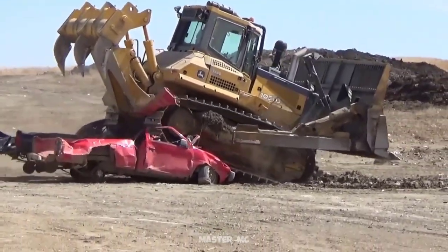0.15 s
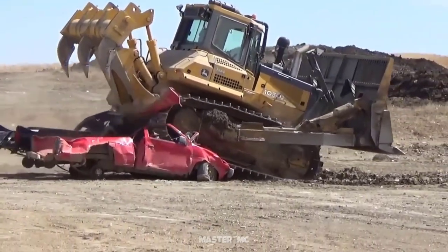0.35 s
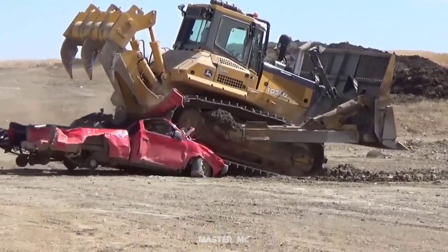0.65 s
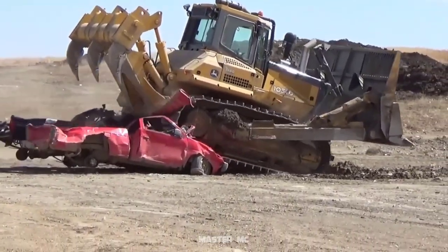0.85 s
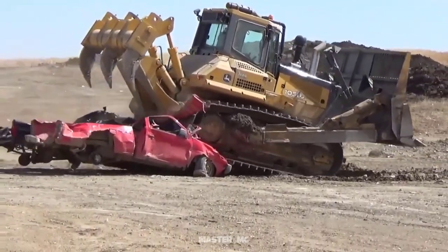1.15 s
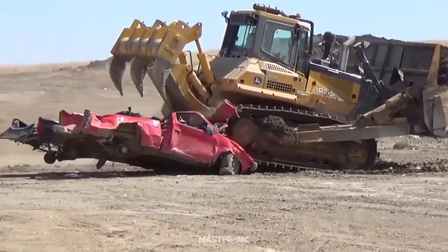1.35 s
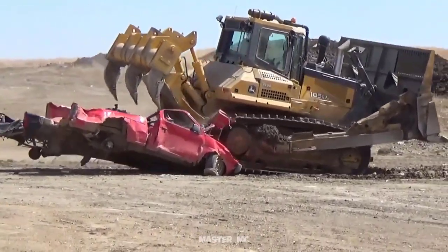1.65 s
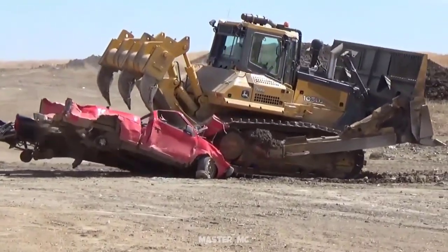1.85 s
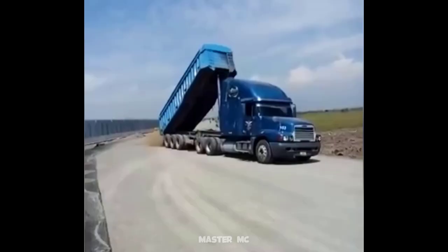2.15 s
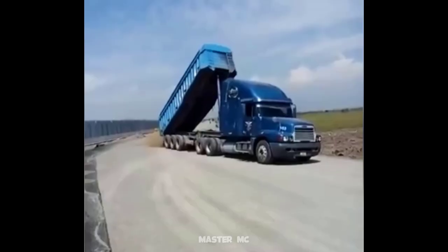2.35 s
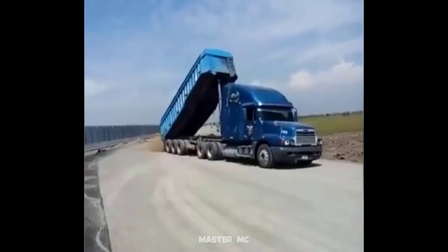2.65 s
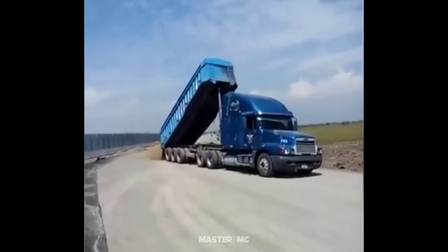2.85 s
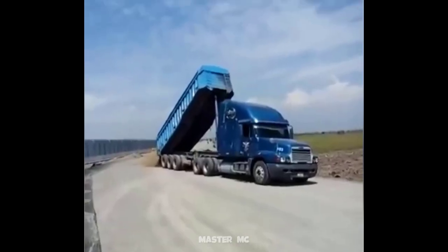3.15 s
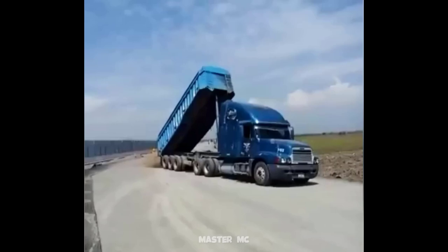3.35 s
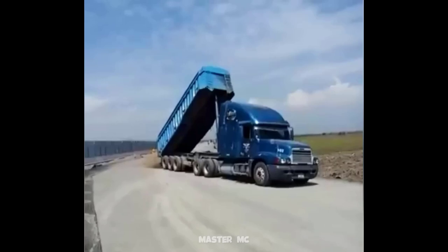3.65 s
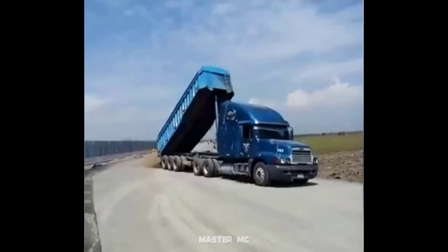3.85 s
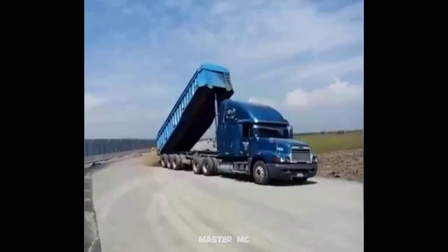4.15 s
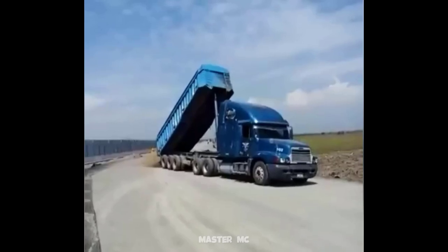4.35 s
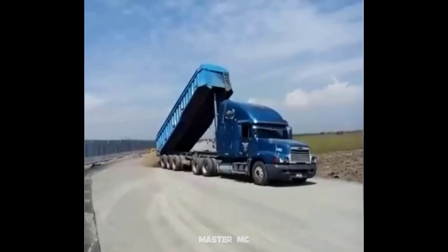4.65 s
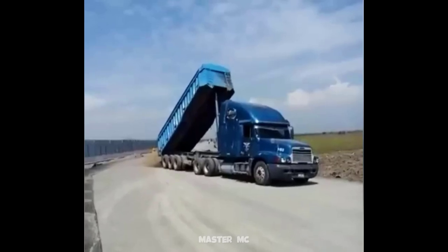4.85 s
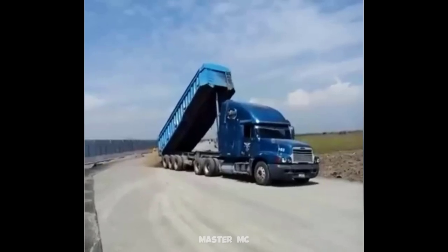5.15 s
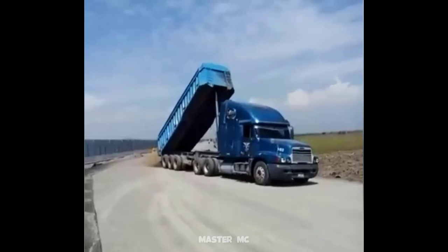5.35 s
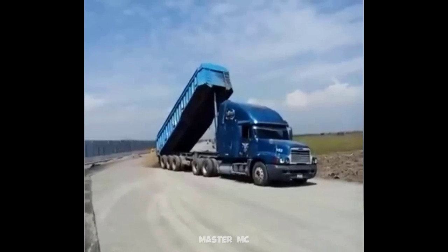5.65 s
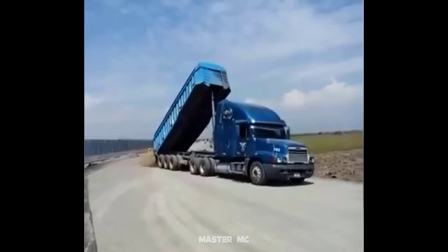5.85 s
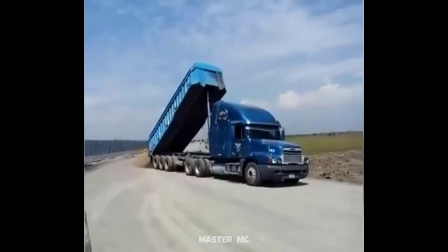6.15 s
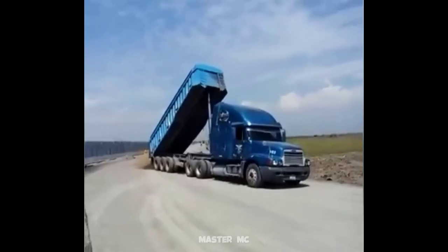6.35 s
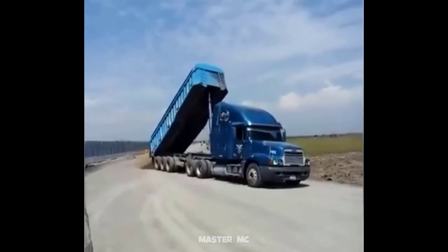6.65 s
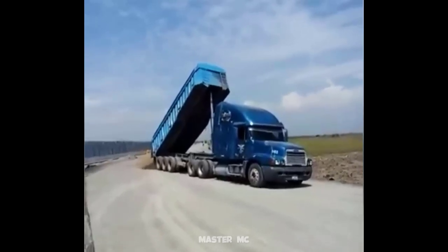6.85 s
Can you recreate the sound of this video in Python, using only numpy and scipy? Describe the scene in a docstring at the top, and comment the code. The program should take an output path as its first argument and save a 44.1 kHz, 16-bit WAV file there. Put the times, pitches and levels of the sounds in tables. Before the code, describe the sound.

A crawler bulldozer drives over a car outdoors, loud and fairly close. Its diesel roars while the tracks scrape over gravel and sheet metal crunches, squeals and tinkles in bursts. After about two seconds, at the hardest crunch, the sound cuts off. A distant tipper truck follows, quieter, duller and in mono, its engine humming at a steady fast idle with a faint hydraulic whine.

```python
"""First a crawler bulldozer grinds over a car: its diesel roars, its tracks scrape over gravel and sheet
metal crunches in bursts, hardest near 2 s, with a drone, brief moans, squeals and screeches. At 2.17 s it
cuts off; a faint blip and a short silence follow. From 2.23 s a distant tipper lorry runs at fast idle,
duller and in mono: a steady engine rumble, the hum of its shaft, fan and gears, and the whine of its
hydraulic pump. It rattles once at 2.6 s, and its treble grows a little near 5.4 s."""
import sys
import numpy as np
from scipy import signal
from scipy.fft import rfft, irfft, next_fast_len
from scipy.io import wavfile
from scipy.ndimage import uniform_filter1d

SR = 44100
rng = np.random.default_rng(int(sys.argv[2]) if len(sys.argv) > 2 else 0)


def output_pcm(signal):
    """Save a mono or channel-first signal as 16-bit PCM at the path in sys.argv[1].

    Samples are clipped to [-1, 1] before scaling.
    """
    pcm = np.clip(np.atleast_2d(signal).T, -1, 1) * 32767
    wavfile.write(sys.argv[1], SR, np.round(pcm).astype(np.int16))


N = 308259
CUT_S, LORRY_IN_S = 2.173, 2.234
GRIT_FROM_HZ, HISS_FROM_HZ = 3770, 5400


def undb(db):
    return 10 ** (np.asarray(db) / 20)


def level(x, db):
    return x * undb(db) / np.sqrt(np.mean(x ** 2))


def at(table, hz):
    """Read a table between its rows, along a pitch scale."""
    return np.interp(np.log(hz), np.log(np.array(table)[:, 0]), np.array(table)[:, 1])


def above(hz, edge_hz):
    return 1 / (1 + (edge_hz / hz) ** 6)


def swell(t, middle_s, ms):
    return np.exp(-.7 * ((t - middle_s) * 2000 / ms) ** 2)


def walk(n, rate):
    """A smooth random wobble of size about 1, with `rate` steps a second."""
    hold = int(SR / rate)
    steps = np.repeat(rng.standard_normal(n // hold + 1), hold)
    return 1.4 * uniform_filter1d(uniform_filter1d(steps, hold), hold)[:n]


def rough(shape, depth_db, rate):
    """Noise whose level jumps about quickly, like many small scrapes."""
    return rng.standard_normal(shape) * undb(depth_db * walk(shape[-1], rate))


def bands(source, gain_db, flicker_db, flicker_rate):
    """Colour a noise and let each half octave flicker, partly with its neighbour."""
    n = source.shape[-1]
    hz = np.maximum(np.fft.rfftfreq(n, 1 / SR), 1)
    spectrum = rfft(source) * undb(gain_db(hz))
    out, last = 0, walk(n, flicker_rate)
    for octave in np.arange(4, 14.6, .5):
        share = np.cos(np.pi * np.clip(np.log2(hz) - octave, -.5, .5)) ** 2
        new = walk(n, flicker_rate)
        out += irfft(spectrum * share, n) * undb(flicker_db * (new + last) / np.sqrt(2))
        last = new
    return out


def tone(t, hz, db, waver_db, drift):
    """One pitch whose level and phase wander slowly."""
    size = np.sqrt(2) * undb(db + waver_db * walk(len(t), 3.98))
    return size * np.sin(2 * np.pi * hz * t + drift * walk(len(t), 2.96))


def squeaks(n, per_s, lo_hz, hi_hz, ms, scatter_db):
    """Short notes at random moments and pitches."""
    age = np.arange(int(ms * SR / 1000))
    out = np.zeros(n + len(age))
    for when, pitch, size, length in rng.random((int(per_s * n / SR), 4)):
        hz = lo_hz * (hi_hz / lo_hz) ** pitch
        shape = np.sin(np.pi * np.minimum(age / len(age) / (0.53 + 0.69 * length), 1)) ** 2
        ring = shape * np.sin(2 * np.pi * hz * age / SR)
        out[int(when * n):][:len(age)] += undb(scatter_db * size) * ring
    return level(out[:n], 0)


# How wide the bulldozer sounds, side against middle: f/Hz, level/dB
WIDTH = [(60, 1), (110, -1), (200, -4), (380, -10), (700, -12), (1290, -8), (2380, -10), (4400, -9),
         (8120, -10), (15000, -12)]
def stereo(noises, colour, weight=lambda hz: 1, **flicker):
    """Colour two noises: one is the middle, the other the left-right difference."""
    def gain_db(hz):
        mid_db = at(colour, hz) + 20 * np.log10(weight(hz) + 1e-9)
        return np.array([mid_db, mid_db + at(WIDTH, hz)])
    mid, side = bands(noises, gain_db, **flicker)
    return np.array([mid + side, mid - side]) / np.sqrt(np.mean(mid ** 2))


# The diesel's tone colour: f/Hz, relative level/dB
ROAR_COLOUR = [(8.8, -56), (15, -20), (66, -23), (119, -7), (213, -8), (251, -2), (345, -3.5), (372, -3.5),
               (440, -3), (474, -8), (846, -5.5), (1300, -27.5), (1690, -76.5), (2860, -120)]
def diesel_roar(n, roar_db, crunch_db):
    """Deep engine noise that swells a little with each crunch."""
    roar = stereo(rough((2, n), 0.47, 59.7), ROAR_COLOUR, flicker_db=0.9, flicker_rate=12.3)
    return roar * undb(roar_db + 0.29 * crunch_db)


# The drone's pitches: multiple of the base pitch, level/dB against the roar
DRONE_TONES = [(11, -17.5), (13, -15), (15, -15), (17, -18), (19, -22.5)]
def drone(t, roar_db, base_hz=29.25):
    """A drone on five steady pitches, about 320-555 Hz, whose level follows the roar."""
    return sum(tone(t, k * base_hz, roar_db + db, waver_db=3, drift=3) for k, db in DRONE_TONES)


# The tone colour of tracks and gravel: f/Hz, relative level/dB
TRACK_COLOUR = [(590, -17), (1000, -4.5), (1230, -9), (1410, -5), (1840, -9), (2310, -6.5), (5700, -17),
                (8320, -17.5), (9550, -22), (13500, -21), (15400, -18)]
# How hard the tracks scrape: t/s, level/dB (scaled for each layer)
SCRAPE_FORCE = [(0, 2.5), (.05, -1), (.15, -4), (.3, -2.5), (.45, -6), (.56, -1.5), (.63, 2), (.75, -0.5),
                (.86, 2), (.95, -1.5), (1.15, 1), (1.3, -1), (1.5, -1.5), (1.75, -1.5), (1.88, -3),
                (1.96, -7.5), (2.17, -7)]
def tracks(t, crunch_db, tinkle_db=-7):
    """Tracks scrape over the car, with squeaks and tinkles of metal and glass."""
    n = len(t)
    grind = stereo(rough((2, n), 0.94, 150), TRACK_COLOUR, lambda hz: 1 - above(hz, GRIT_FROM_HZ),
                   flicker_db=1.32, flicker_rate=20)
    grind += undb(-7) * squeaks(n, 240, 1300, 3500, ms=32, scatter_db=9)
    scrape = rough((2, n), 1.0, 90)
    hiss_band = lambda hz: above(hz, HISS_FROM_HZ)
    grit_band = lambda hz: above(hz, GRIT_FROM_HZ) * (1 - hiss_band(hz))
    grit = stereo(scrape, TRACK_COLOUR, grit_band, flicker_db=1.0, flicker_rate=55)
    hiss = stereo(scrape, TRACK_COLOUR, hiss_band, flicker_db=1.4, flicker_rate=45)
    grit += undb(tinkle_db) * squeaks(n, 260, 3200, 7500, ms=14, scatter_db=14)
    hiss += undb(tinkle_db) * squeaks(n, 600, 11000, 15300, ms=7, scatter_db=10)
    scrape_db = np.interp(t, *np.transpose(SCRAPE_FORCE))
    # the brighter the layer, the more it follows scrapes and crunches
    return (grind * undb(-31.5 + 0.42 * scrape_db + 0.15 * crunch_db)
            + grit * undb(-39 + 1.3 * scrape_db + 0.82 * crunch_db)
            + hiss * undb(-43.5 + 1.66 * scrape_db + crunch_db))


# The loudest moans and squeals: middle t/s, f/Hz, level/dB, length/ms
BRIEF_TONES = [(0.02, 5220, -41, 22), (0.025, 2350, -38, 45), (0.045, 3150, -41, 26),
               (0.085, 2783, -37, 49), (0.2, 330, -27.5, 65), (0.265, 1465, -35.5, 27),
               (0.51, 1560, -38, 41), (1.0, 1650, -36, 46), (1.18, 1700, -36, 50), (0.111, 182.5, -24, 25),
               (0.17, 323, -35, 63), (0.362, 901, -28.5, 51), (0.414, 764, -22.5, 13),
               (0.385, 370.6, -25.5, 140), (0.8, 375, -30, 62), (1.19, 321, -32, 80), (1.35, 365, -29, 95),
               (1.64, 379, -31, 90), (2.0, 375, -29, 31), (0.486, 272, -28, 86), (0.738, 441, -22.5, 57),
               (0.826, 807, -29, 57), (0.903, 435, -25, 75), (1.122, 393, -28, 54), (1.182, 4150, -40, 30),
               (1.28, 864, -28, 48), (1.282, 254.2, -33.5, 370), (1.3, 2353, -35, 47),
               (1.554, 447, -26, 54), (1.634, 322.6, -26, 72), (1.659, 1463, -34, 57),
               (1.695, 4100, -36, 15), (1.878, 384, -25, 156), (2.085, 1400, -35, 25),
               (2.128, 1500, -26.5, 15), (2.166, 4870, -37, 13)]
def moans_and_squeals(t, roar_db):
    """Short low moans and high squeals, each on one pitch, with fainter ones at random."""
    small = undb(roar_db - 11) * squeaks(len(t), 30, 240, 950, ms=120, scatter_db=5)
    return small + sum(swell(t, s, ms) * tone(t, hz, db, waver_db=-0.5, drift=1.91)
                       for s, hz, db, ms in BRIEF_TONES)


# Metallic screeches: middle t/s, f/Hz, width/Hz, level/dB, length/ms
METAL_SCREECHES = [(.03, 2340, 450, -34, 80), (.04, 1400, 500, -37.5, 110), (.11, 3000, 600, -35, 120),
                   (.53, 1580, 300, -35, 88), (1.315, 2400, 350, -34.5, 170), (1.27, 3000, 500, -37, 66),
                   (1.73, 2600, 900, -34, 70), (0.63, 2300, 900, -36, 60), (0.805, 1670, 390, -36, 64),
                   (2.07, 2600, 700, -43, 98)]
def screeches(t):
    """Rough metallic screeches: short swells of noise, each around one pitch."""
    out = 0
    for s, hz, width_hz, db, ms in METAL_SCREECHES:
        band = 1 / (1 + (2 * (np.fft.rfftfreq(len(t), 1 / SR) - hz) / width_hz) ** 2)
        mid, side = irfft(rfft(rng.standard_normal((2, len(t)))) * band, len(t))
        side *= undb(at(WIDTH, hz))
        out += level(np.array([mid + side, mid - side]), db) * swell(t, s, ms)
    return out


def thud(t, start_s=.1, hz=80, db=-23, fade_s=.14):
    """The frame lurches: one low note that dies quickly."""
    age = np.maximum(t - start_s, 0)
    return undb(db - 60 * age / fade_s) * np.sin(2 * np.pi * hz * age)


# The car body giving way: t/s, level/dB (scaled for each layer), length/ms
CRUNCH_BURSTS = [(.217, 6.5, 16), (.268, 5, 27), (.396, 6, 17), (.449, 5, 20), (.502, 4.5, 17),
                 (.605, 3, 10), (.634, 1, 14), (.674, 2, 7), (.692, 5, 12), (.866, 1, 27), (.993, 2.5, 19),
                 (1.08, 2, 27), (1.171, -2, 22), (1.21, 0, 11), (1.273, 4.5, 33), (1.355, 1.5, 12),
                 (1.398, 4.5, 28), (1.527, 2.5, 32), (1.667, 2.5, 38), (1.694, -1, 9), (1.743, 2.5, 33),
                 (1.819, 4.5, 52), (1.897, 12, 19), (1.935, 12, 19), (2.001, 13.5, 40), (2.066, 13.5, 31),
                 (2.128, 12.5, 43), (2.168, 14.5, 12)]
def crunches(t, rise_share=0.36):
    """The boost in dB as metal crumples under the track: quick up, slower down."""
    boost_db = 0
    for s, db, ms in CRUNCH_BURSTS:
        away = np.abs(t - s) * 1000 / ms
        fall = np.where(t < s, (away / rise_share) ** 2, (away / (1 - rise_share)) ** 1.4)
        boost_db += db * np.exp(-fall)
    return boost_db


# The roar builds, holds and eases off: t/s, level/dB
ROAR_LOUDNESS = [(0, -25.5), (.14, -27), (.21, -22.5), (.45, -24), (1.1, -25), (1.94, -24.5), (1.982, -34),
                 (2.0, -26.5), (2.04, -28.5), (2.07, -26.5), (2.17, -31)]
# The machine's noise, heard again a moment later: delay/ms, gain
QUICK_REPEATS = [(16.0, 0.32), (18.2, 0.21)]
# Left against right: f/Hz, level/dB
BALANCE = [(60, 1.0), (110, 0.5), (200, -0.5), (380, -2.5), (700, -1.0), (1290, -1.0), (2380, -1.0),
           (4400, -1.0), (8120, 0.5), (15000, 0.0)]
def bulldozer(tail_s=.032):
    """Noises with two duller repeats, and tones on top, all cut off to a faint tail."""
    n = next_fast_len(int((CUT_S + tail_s) * SR) + 1, real=True)
    t = np.arange(n) / SR
    hz = np.maximum(np.fft.rfftfreq(n, 1 / SR), 1)
    crunch_db = crunches(t)
    roar_db = np.interp(t, *np.transpose(ROAR_LOUDNESS))
    noises = diesel_roar(n, roar_db, crunch_db) + tracks(t, crunch_db) + screeches(t)
    tones = moans_and_squeals(t, roar_db) + drone(t, roar_db) + thud(t)
    repeats = sum(gain * np.exp(-2j * np.pi * hz * ms / 1000) for ms, gain in QUICK_REPEATS)
    repeats *= above(hz, 36) / (1 + (hz / 1100) ** 2) ** 0.25
    left_right = np.array([[1], [-1]])
    wide = 1 + 1j * left_right * undb(at(WIDTH, hz) - 4)  # tones reach the two sides out of step
    pan = undb(left_right * at(BALANCE, hz) / 2)
    machine = irfft((rfft(noises) * (1 + repeats) + rfft(tones) * wide) * pan, n)
    cut = np.clip((CUT_S - t) / .0024, 0, 1)
    tail = undb(-16 - 60 * np.maximum(t - CUT_S, 0) / .07) * np.clip((CUT_S + tail_s - t) / .006, 0, 1)
    return np.pad(machine * np.maximum(cut, tail), ((0, 0), (0, N - n)))


def blip(hz=2100, db=-45, fade_s=.1, length_s=.028):
    """A faint, very brief tone sounds just after the cut."""
    age = np.clip(np.arange(N) / SR - CUT_S, 0, 1)
    ending = np.clip((length_s - age) / .006, 0, 1)
    return undb(db - 60 * age / fade_s) * np.sin(2 * np.pi * hz * age) * ending


# The lorry engine's tone colour: f/Hz, relative level/dB
RUMBLE_COLOUR = [(15, -44.5), (25, -33.5), (59, -16.5), (224, -3.5), (274, -10), (335, -6.5), (514, -15.5),
                 (629, -17.5), (851, -21), (1310, -24.5), (1560, -19.5), (2160, -35.5), (7420, -50.5),
                 (9550, -47.5), (10300, -56.5), (13400, -95), (22000, -120)]
# Where its casing rings: f/Hz, width/Hz, boost/dB
CASING_RINGS = [(158, 18, 0.5), (196.5, 19.5, 6), (313, 69, 6), (470, 32, 2), (640, 110, 4.5),
                (2530, 760, 2.5), (3400, 1200, -1.5), (5400, 620, 2.5), (7350, 500, -2.5), (9960, 500, 0),
                (1550, 360, 0)]
# The deepest bass rises and falls: t/s, boost/dB
BASS_SWAY = [(2.3, 2), (3.2, 2.5), (3.5, -4), (4.5, 0.5), (5.5, -1.5), (5.9, 1), (6.95, -1)]
def rumble(t):
    """Engine noise through the ringing casing; the bass sways and the treble steps up once."""
    def colour(hz):
        rings_db = sum(db / (1 + (2 * (hz - f) / width) ** 2) for f, width, db in CASING_RINGS)
        return at(RUMBLE_COLOUR, hz) + rings_db
    engine = level(bands(rough(t.shape, 0.18, 40), colour, flicker_db=0.12, flicker_rate=6.05), -38.5)
    bass = signal.sosfiltfilt(signal.butter(2, 100, fs=SR, output="sos"), engine)
    treble = signal.sosfiltfilt(signal.butter(2, 2000, "high", fs=SR, output="sos"), engine)
    bass_db = np.interp(t, *np.transpose(BASS_SWAY))
    treble_db = 1.2 * np.clip((t - 5.35) / .3, -.5, .5)
    return undb(bass_db) * bass + (engine - bass - treble) + undb(treble_db) * treble


# The shaft's pitches: multiple of its turning rate, level/dB
SHAFT_TONES = [(4, -49.5), (5, -53), (14, -60.5), (18, -60), (20, -60.5), (24, -72), (25, -65.5),
               (29, -66.5), (31, -68), (32, -65), (37, -72)]
def shaft(t, turns_per_s=31.48):
    """The spinning shaft hums at whole multiples of its rate."""
    return sum(tone(t, k * turns_per_s, db, waver_db=1.5, drift=2.5) for k, db in SHAFT_TONES)


# The gears' pitches: f/Hz, level/dB
GEAR_TONES = [(197.8, -54), (588.1, -61), (1126.5, -66.5), (1690.4, -70), (1812.8, -74), (1845.1, -71.5),
              (1968, -75)]
# Swells of the lowest one: middle t/s, boost/dB, half length/s
GEAR_SWELLS = [(2.45, 7, 0.07), (2.68, 5, .05), (3.2, 7, .06), (4.826, 14, 0.046)]
def gears(t):
    """The gears sing on wavering tones; the lowest swells now and then."""
    swell_db = sum(db * np.exp(-((t - s) / half_s) ** 2) for s, db, half_s in GEAR_SWELLS)
    return sum(tone(t, hz, db + swell_db * (i == 0), waver_db=3.5, drift=3.2)
               for i, (hz, db) in enumerate(GEAR_TONES))


def fan(t):
    """The fan holds one almost steady note."""
    return tone(t, hz=226.5, db=-40, waver_db=-0.14, drift=0.3)


# The whine at 1 to 5 times the pump's pitch: relative level/dB
PUMP_TONES = [5.5, 4.5, -1, -8.5, -14.5]
# Dips in the whine: middle t/s, depth/dB, half length/s
PUMP_DIPS = [(2.3, 5, .06), (3.7, 7, 0.36), (4.82, 3, 0.15), (5.27, 1, .1), (6.78, 10, 0.076)]
def pump(t):
    """Two sections of the hydraulic pump whine slightly apart, so their sound pulses."""
    dip_db = sum(db * np.exp(-((t - s) / half_s) ** 4) for s, db, half_s in PUMP_DIPS)
    return sum(tone(t, k * hz, section_db + db - dip_db, waver_db=2, drift=1.34)
               for hz, section_db in ((777.1, -71.5), (779.3, -76.5))
               for k, db in enumerate(PUMP_TONES, 1))


def rattle(t, middle_s=2.633):
    """One brief, bright rattle of noise."""
    burst = undb(-45.5) * np.exp(-np.abs(t - middle_s) / .0083) * rng.standard_normal(len(t))
    return signal.sosfilt(signal.butter(2, [2000, 3600], "band", fs=SR, output="sos"), burst)


def lorry(top_hz=9950, fade_in_s=.013):
    """The distant idling lorry, with its highest treble cut away."""
    start = int(LORRY_IN_S * SR)
    age = np.arange(next_fast_len(N - start, real=True)) / SR
    t = LORRY_IN_S + age
    out = rumble(t) + shaft(t) + gears(t) + fan(t) + pump(t) + rattle(t)
    out = signal.sosfilt(signal.ellip(10, .2, 60, top_hz, fs=SR, output="sos"), out)
    out *= np.clip(age / fade_in_s, 0, 1) ** 2
    return np.pad(out, (start, 0))[:N]


def scene():
    """The two places, one after the other."""
    return bulldozer() + blip() + lorry()


def record(dry, top_hz=15550):
    """Round off the loudest peaks and cut the very highest treble."""
    rounded = np.tanh(1.5 * dry) / 1.5
    return signal.sosfilt(signal.ellip(12, .2, 80, top_hz, fs=SR, output="sos"), rounded)


dry = scene()
out = record(dry)
output_pcm(out)
```